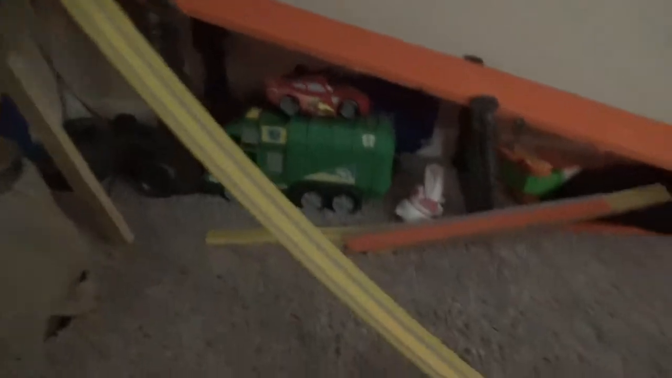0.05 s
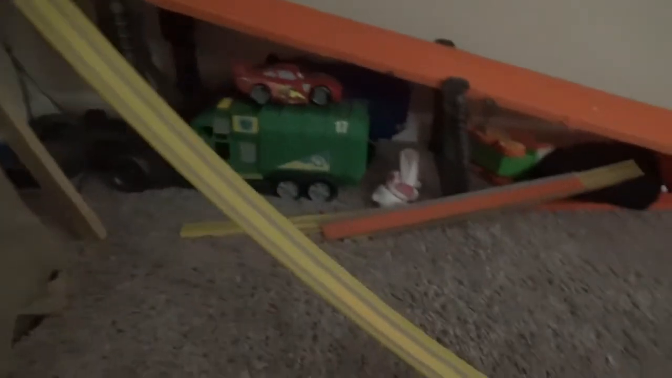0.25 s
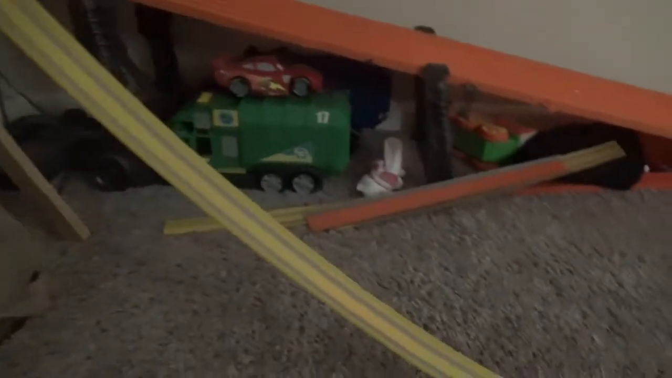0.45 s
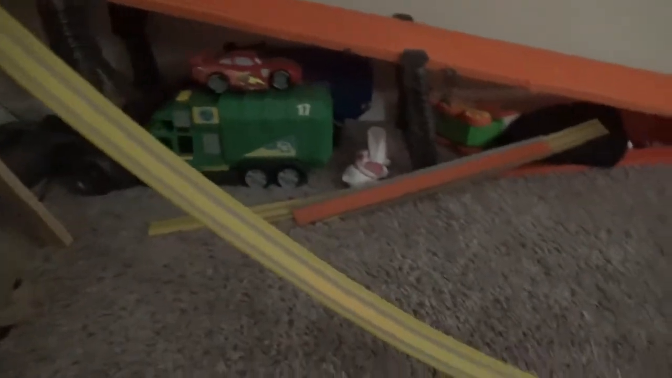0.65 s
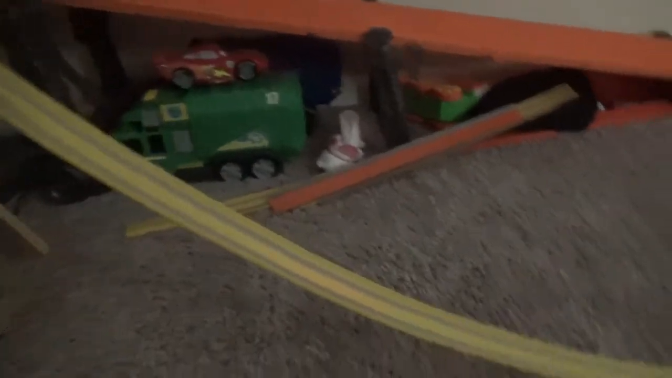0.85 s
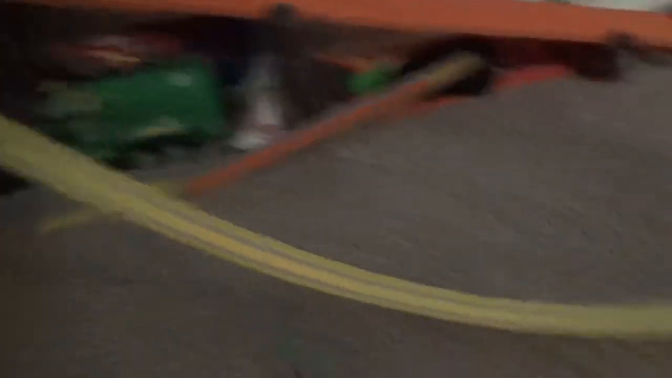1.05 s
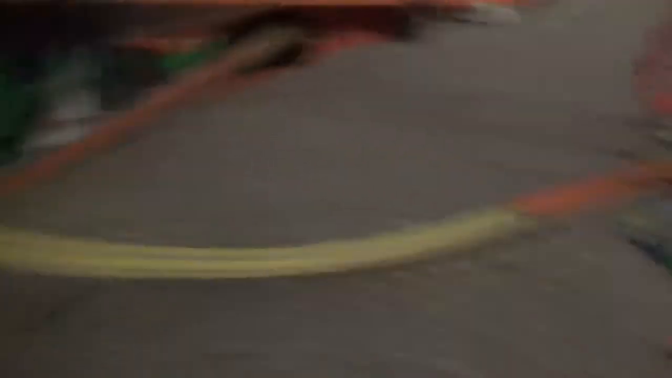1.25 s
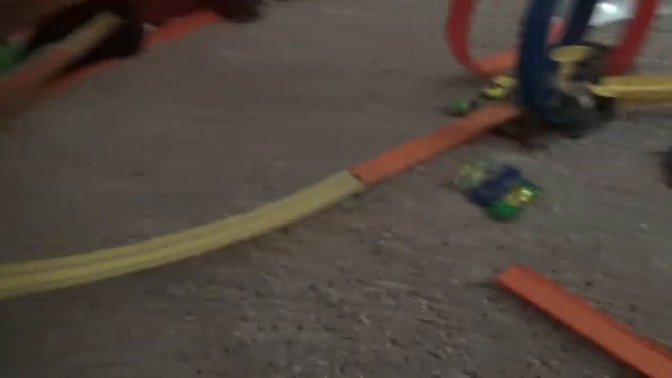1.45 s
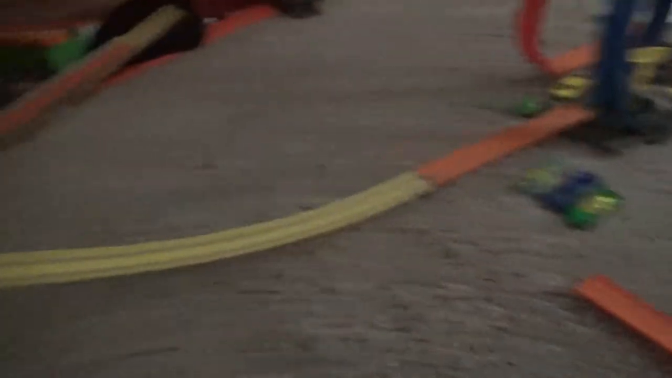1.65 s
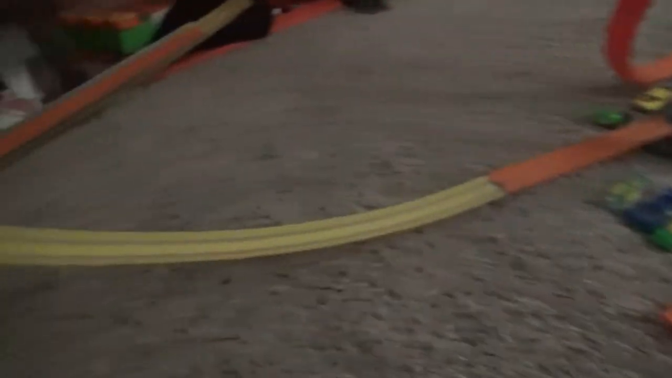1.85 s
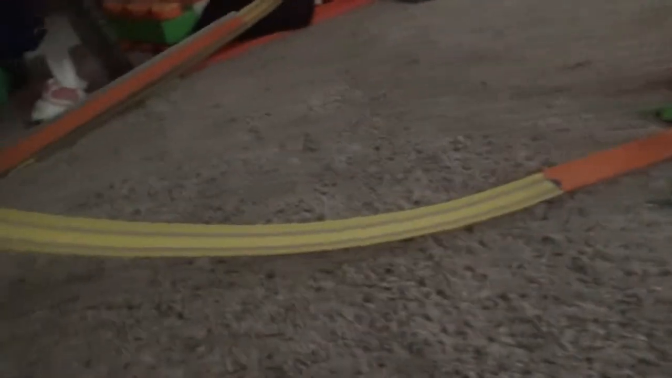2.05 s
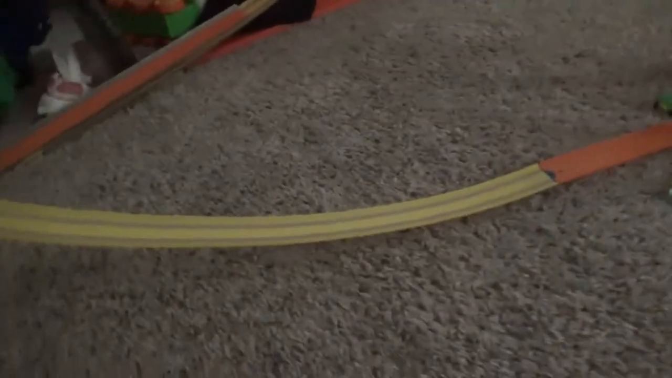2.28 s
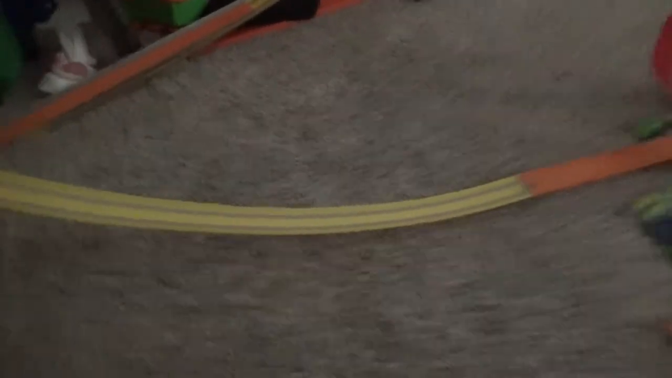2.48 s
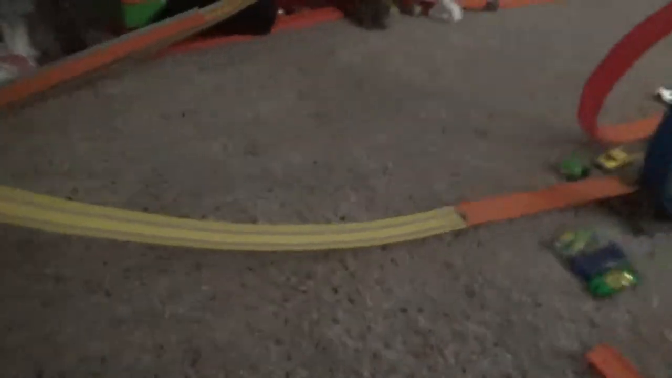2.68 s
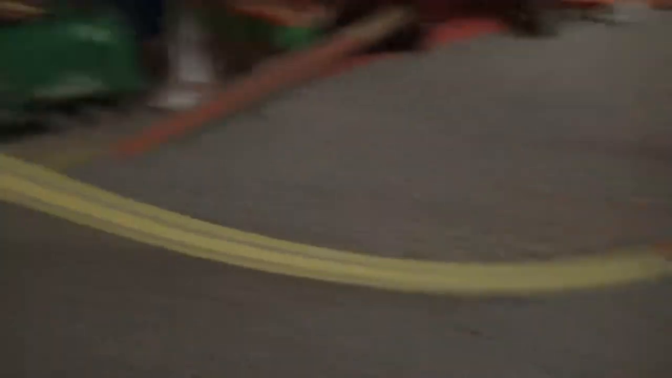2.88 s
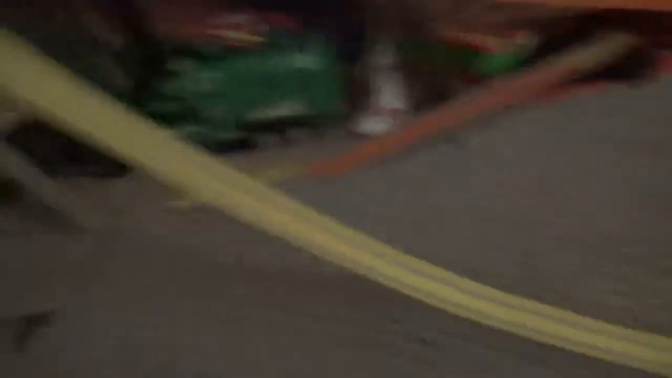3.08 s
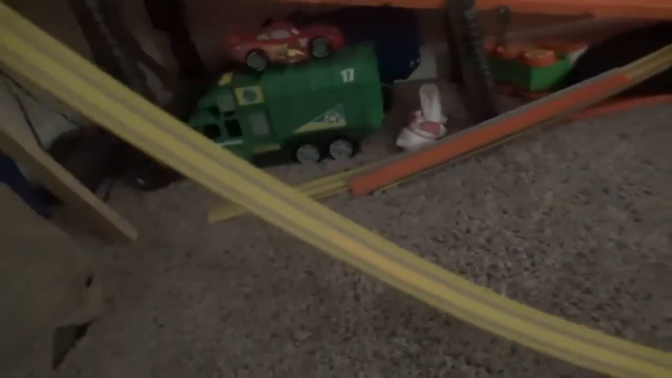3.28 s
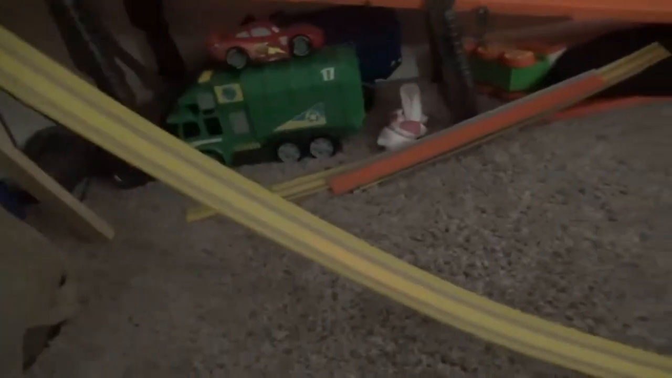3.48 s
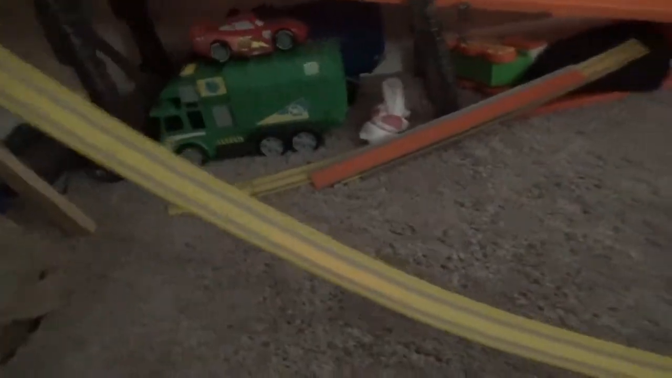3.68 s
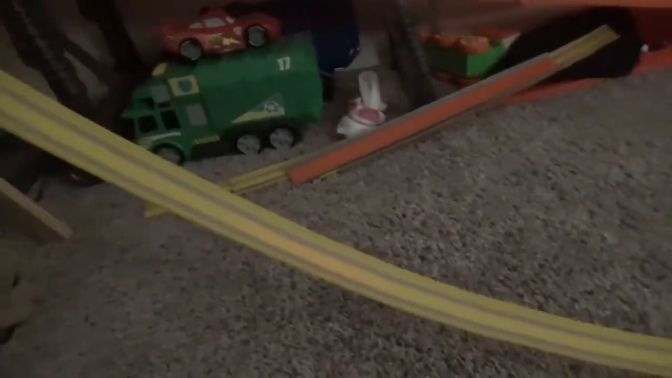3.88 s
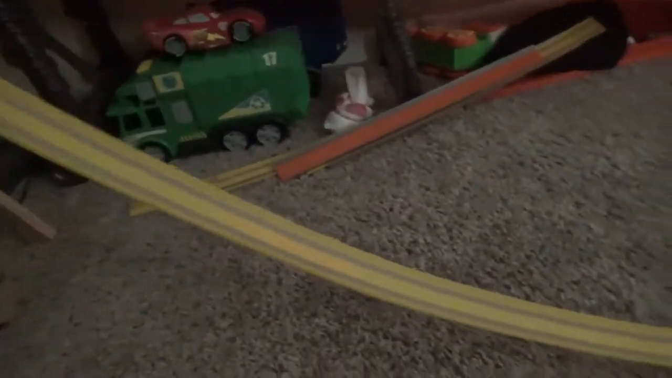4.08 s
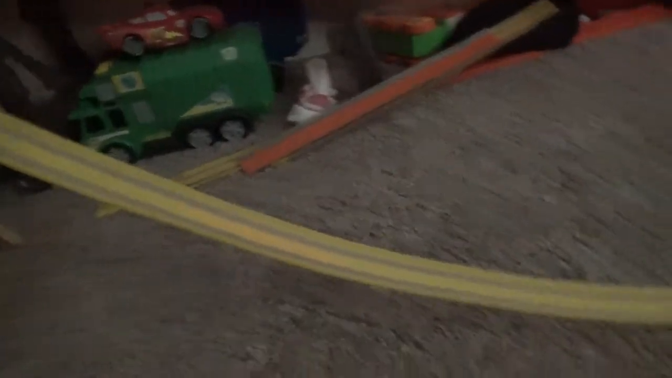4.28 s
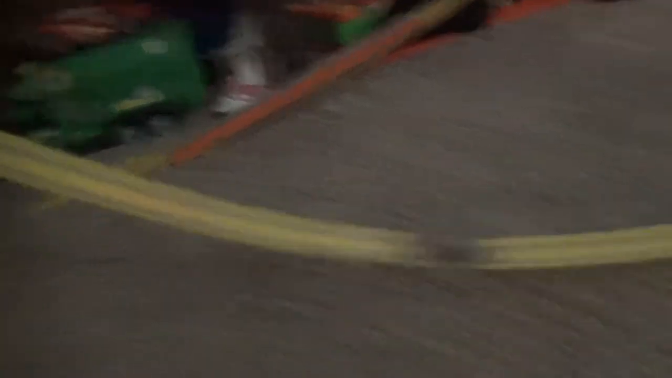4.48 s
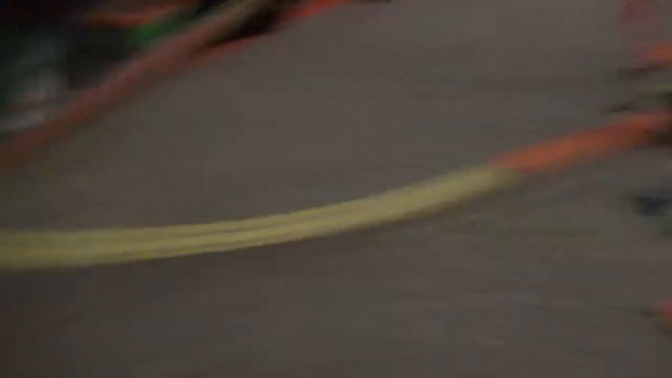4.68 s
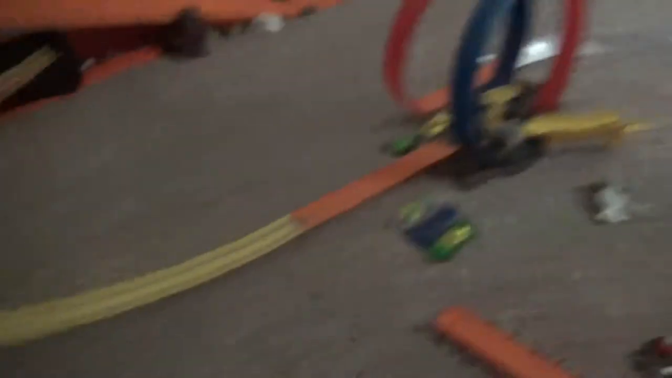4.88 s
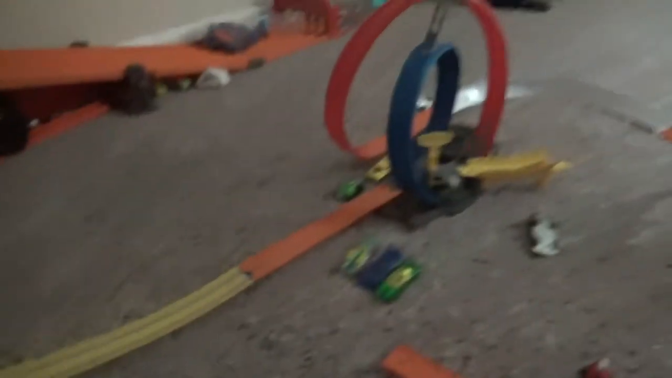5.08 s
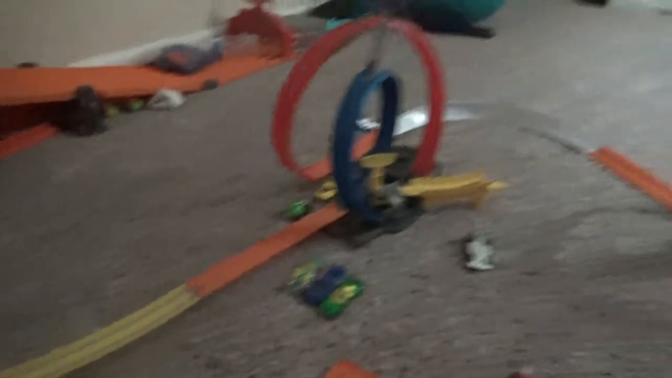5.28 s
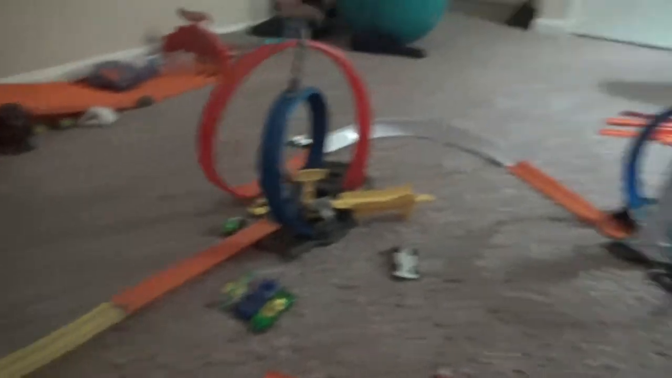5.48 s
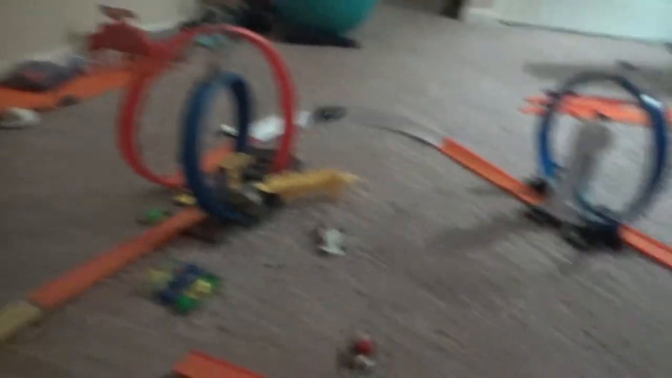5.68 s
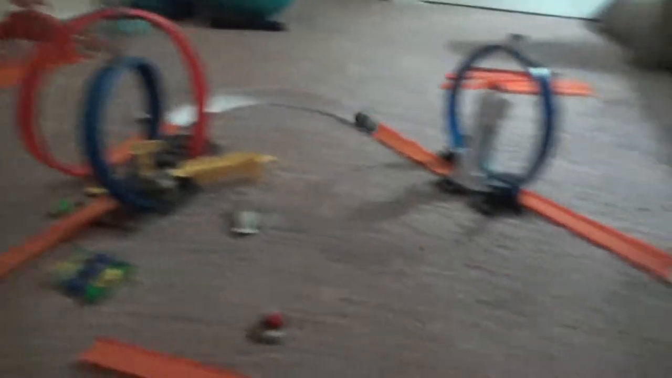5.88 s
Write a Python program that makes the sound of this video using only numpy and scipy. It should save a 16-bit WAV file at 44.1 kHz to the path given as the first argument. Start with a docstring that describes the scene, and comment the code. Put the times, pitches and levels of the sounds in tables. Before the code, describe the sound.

Hard plastic clacks with rising scraping hiss come first, followed by dull floor bumps and small bright metallic clicks that thin out. A few more gate knocks lead to release: a toy car's wheels buzz and rattle over hollow track, swelling and dipping, snapping over joints to the end. Indoors, short room reflections, close handheld stereo microphone.

```python
"""A start gate clacks and scrapes in a quiet carpeted room with a faint hum: a toy car is being loaded.
Soft bumps sound close by and die-cast cars click in a hand; then the car rattles down a plastic track,
through a loop and over the joints. Random bursts and streams of tiny contacts ring filters shaped like
the toys; a bump is one low push. A hand-held camera hears it all in stereo, with the room's answer."""
import sys
import numpy as np
from scipy import signal
from scipy.fft import rfft, irfft, next_fast_len
from scipy.io import wavfile
from scipy.ndimage import uniform_filter1d, map_coordinates

SR = 44100
rng = np.random.default_rng(int(sys.argv[2]) if len(sys.argv) > 2 else 0)


def digitize_waveform(pressure):
    """Quantize a signal to 16-bit integers and store it at the path in sys.argv[1].

    Rows of a 2-D input are taken as channels; values are limited to [-1, 1].
    """
    field = np.atleast_2d(pressure).T
    bounded = np.clip(field, -1, 1)
    quanta = np.round(bounded * 32767).astype(np.int16)
    wavfile.write(sys.argv[1], SR, quanta)


N = 261954  # length in samples
FILTER_SIZE = 18432  # samples


def amp(db):
    """Turn decibels into a gain."""
    return 10 ** (np.asarray(db) / 20)


def unit(x):
    """Scale x to an rms of 1."""
    return x / np.sqrt(np.mean(x ** 2) + 1e-20)


def along(points, hz):
    """Read a curve of (f/Hz, value) points at any frequency, on a log frequency axis."""
    f, value = np.transpose(points)
    return np.interp(np.log(hz + 1), np.log(f + 1), value)


def wobble(rate):
    """A smooth random curve through `rate` random points a second."""
    points = rng.standard_normal(int(N * rate / SR) + 4)
    return map_coordinates(points, [np.arange(N) * rate / SR])


def filtered(x, response):
    """Weigh each frequency of x by response(hz)."""
    size = next_fast_len(x.shape[-1] + FILTER_SIZE)
    spectrum = rfft(x, size) * response(np.fft.rfftfreq(size, 1 / SR))
    return irfft(spectrum, size)[..., :x.shape[-1]]


# how much two close microphones differ in sound from all around: f/Hz, side level re middle/dB
STEREO_WIDTH = [(100, -32), (300, -18.5), (1300, -6), (5500, -5.5), (9000, -6), (13000, -46)]


def spread(pair):
    """Make unrelated signals into left and right: close microphones differ by an amount set by pitch."""
    side = filtered(pair[1], lambda hz: amp(along(STEREO_WIDTH, hz)))
    return np.array([pair[0] + side, pair[0] - side])


# colour of the still room's noise, shape only: f/Hz, level/dB
AIR_COLOUR = [(15, -38), (25, -12), (69, -4), (178, -3.5), (246, -8), (281, -11.5), (482, -10),
              (762, -13.5), (1240, -17), (1380, -19.5), (1710, -22), (2060, -24), (2230, -20.5),
              (3630, -25), (15500, -33)]


def still_room(air_db=-46.0, hum_db=-59, mains_hz=60):
    """Soft coloured noise for the room's air, and a faint mains hum whose strength wavers."""
    noise = spread(rng.standard_normal((2, N)))
    air = unit(filtered(noise, lambda hz: amp(along(AIR_COLOUR, hz))))
    tone = np.sin(2 * np.pi * mains_hz * np.arange(N) / SR)
    hum = unit(tone * amp(8.3 * wobble(4.2)))
    return amp(air_db) * air + amp(hum_db) * hum


def contacts(rate, scatter_db, judder_db, judder_rate):
    """Tiny uneven impacts, about `rate` a second, of limited strength that swells and sinks in clumps."""
    kicks = (rng.random(N) < rate / SR) * rng.choice([-1, 1], N)
    scatter = scatter_db * np.tanh(rng.standard_normal(N))
    judder = judder_db * np.tanh(wobble(judder_rate))
    return kicks * amp(scatter + judder)


def stroke_gain(rows, attack_s, release_s, swell_db_per_s=0):
    """Loudness of (start, length, level) strokes: each fades in, holds or swells to its level, dies away."""
    t, gain = np.arange(N) / SR, np.zeros(N)
    for start, length, db in rows:
        end = start + length
        gate = np.interp(t, [start - attack_s, start, end, end + release_s], [0, 1, 1, 0]) ** 2
        gain += gate * amp(db - swell_db_per_s * np.maximum(end - t, 0))
    return gain


def body(spectrum, modes=()):
    """How a thing sounds when tapped: a broad spectrum with resonances (f/Hz, width/Hz, level/dB) on it."""
    hz = np.fft.rfftfreq(FILTER_SIZE, 1 / SR)
    peaks = sum(amp(db) ** 2 / (1 + (2 * (hz - centre) / width) ** 2) for centre, width, db in modes)
    loudness = amp(along(spectrum, hz)) * np.sqrt(1 + peaks)
    # fold the cepstrum so that nothing sounds before the tap (minimum phase)
    cepstrum = irfft(np.log(loudness))
    cepstrum[1:FILTER_SIZE // 2] *= 2
    cepstrum[FILTER_SIZE // 2:] = 0
    return irfft(np.exp(rfft(cepstrum)))[:4096]


# where the action is, seen from the camera: t/s, bearing (1 = left .. -1 = right)
BEARING = [(0, 0.7), (0.95, 0.55), (1.1, 0.05), (1.4, 0.75), (2.4, 0.55), (2.8, 0.42), (4.1, 0.45),
           (4.36, 0.87), (4.5, -0.015), (5.2, -0.024), (5.94, 0.072)]
# how a sound from fully one side differs between the microphones: f/Hz, side level re middle/dB
SHADE = [(200, -31), (700, -11), (1300, -4), (4400, -1), (6800, -2.5), (8500, -6), (14000, -12)]


def direct(x, s):
    """x straight from its bearing, starting at s: the camera's body shades the far microphone."""
    bearing = np.interp(s + np.arange(len(x)) / SR, *np.transpose(BEARING))
    side = bearing * filtered(x, lambda hz: amp(along(SHADE, hz)))
    return np.array([x + side, x - side])


# how long the room takes to fade by 60 dB: f/Hz, t60/s
ROOM_FADE = [(150, 0.24), (1000, 0.48), (2700, 0.45), (7000, 0.45), (14000, 0.27)]
# colour of what the carpeted room gives back: f/Hz, level/dB
CARPET = [(9000, 0.5), (11000, 0), (15000, 0.5)]


def in_room(x, room_db, build_s=0.0026):
    """The room's answer to x: a fresh random tail that builds up, then fades at each pitch's own speed."""
    hz, t, grid = signal.stft(rng.standard_normal((2, FILTER_SIZE)), SR, nperseg=256)
    fade_db = along(CARPET, hz)[:, None] - 60 * t / along(ROOM_FADE, hz)[:, None]
    tail = signal.istft(grid * amp(fade_db), SR, nperseg=256)[1]
    tail *= 1 - np.exp(-(np.arange(tail.shape[1]) / SR / build_s) ** 2)
    answer = amp(room_db) * spread(tail / np.linalg.norm(tail[0]))
    return signal.fftconvolve(x[None], answer, axes=1)


def add(out, s, x):
    """Mix x into out at time s."""
    start = max(0, round(s * SR))
    out[:, start:start + x.shape[1]] += x[:, :N - start]


def at_level(x, db, window_s=0.0014):
    """Scale x so that its loudest short window has this level."""
    power = uniform_filter1d(x ** 2, max(2, round(window_s * SR)), mode="constant")
    return amp(db) * x / np.sqrt(power.max())


def chatter(force, ranges, modes, room_db, uneven_db=2, uneven_rate=70):
    """A stream of contacts rings each (spectrum, gain) range, never quite evenly."""
    sound = np.zeros(N)
    for spectrum, gain in ranges:
        stress = force * amp(uneven_db * np.tanh(wobble(uneven_rate)))
        sound += gain * unit(signal.oaconvolve(stress, body(spectrum, modes))[:N])
    out, step = direct(sound, 0), SR // 10
    # the room answers differently from each place along the way
    for start in range(0, N, step):
        add(out, start / SR, in_room(sound[start:start + step], room_db))
    return out / np.sqrt(1 + amp(room_db) ** 2)  # make space for the room's share


# three ranges in which the toys ring, low to high, shape only: f/Hz, level/dB
HOLLOW = [(200, -34), (700, -16), (1100, -8.5), (1400, -2.5), (2100, 2.5), (2800, -5), (6000, -57)]
SHELL = [(700, -52.5), (1900, -12.5), (2600, -1.5), (3400, 0.5), (5200, 4.5), (6800, -8.5), (14000, -56.5)]
BRIGHT = [(2000, -45), (4800, -5), (6500, -2.5), (8700, 2.5), (10000, -1), (11200, -8), (13000, -12.5),
          (15500, -21)]


def hard_blows(table, modes, attack_s, ring_width_hz=690, ring_db=9):
    """Each blow is a dying burst of tiny contacts that rings a toy's three ranges and any pitches of its own.

    Rows: t/s, level of the bright part/dB, hollow and shell parts re that/dB, chatter t60/s, room/dB, f/Hz..."""
    out, t = np.zeros((2, N)), np.arange(SR // 10) / SR
    for s, db, hollow_db, shell_db, t60, room_db, *pitches in table:
        rings = list(modes) + [(hz, ring_width_hz, ring_db) for hz in pitches]
        fade = amp(-60 * t / max(t60, .002))
        burst = rng.standard_normal(len(t)) * fade * (1 - np.exp(-t / attack_s))
        blow, radiated = 0, 0
        for spectrum, relative_db in (HOLLOW, hollow_db), (SHELL, shell_db), (BRIGHT, 0):
            response = body(spectrum, rings)
            part = at_level(signal.fftconvolve(burst, response), db + relative_db)
            blow = blow + part
            # the room gathers all directions: the same energy in a smoother spectrum
            radiated = radiated + response * np.linalg.norm(part) / np.linalg.norm(response)
        add(out, s, direct(blow, s))
        add(out, s, in_room(0.89 * radiated + 0.63 * blow[:len(radiated)], room_db))
    return out


# clacks of the start gate: t/s, level/dB, hollow tone re level/dB, chatter t60/s, room/dB
GATE_CLACKS = [(0.005, -15.5, -4, 0.039, 4), (0.590, -17, 4, 0.078, -2.5), (0.648, -17, 0.5, 0.06, -3.5),
               (0.698, -15.5, 3, 0.029, -0.5), (0.783, -17, -3, 0.045, -2.5), (0.811, -17.5, -8, 0.046, -4),
               (0.875, -18.5, -26, 0.018, 5.5), (0.929, -14, -9, 0.034, -8), (0.942, -13, -4.5, 0.046, -11),
               (3.215, -21.5, 1, 0.013, 4), (3.239, -12.5, 2, 0.032, -10.5), (3.336, -25.5, -25, 0.019, 0),
               (3.394, -30, -5, 0.02, -3), (3.417, -33, 9, 0.015, -6.5), (3.625, -16.5, -5.5, 0.055, 7.5),
               (3.967, -48.5, 12, 0.067, 3.5), (4.030, -24.5, 7.5, 0.029, -2), (4.091, -21.5, 4, 0.03, -2),
               (4.136, -17.5, 4, 0.047, -1.5)]
# the car scrapes in the gate: start t/s, length t/s, hiss level at the end/dB, hollow tone level/dB
GATE_SCRAPES = [(0.504, 0.075, -53, -48.5), (0.586, 0.16, -27.5, -33.5), (0.778, 0.17, -21.5, -30),
                (1.151, 0.075, -60, -34), (3.303, 0.13, -46, -36), (3.99, 0.05, -48, -48),
                (4.031, 0.17, -31, -34.5)]
# pitches at which the gate rings: f/Hz, width/Hz, level above the broad sound/dB
GATE_MODES = [(359, 18, 20), (1372, 67, 8), (1587, 230, 5.5), (1950, 47, -11), (2304, 56, 2),
              (2880, 42, -2.5), (5220, 250, 0.5), (5900, 190, -3), (7140, 120, 2), (9100, 250, 3)]
# the lowest range of the scrapes and of the car's run, shape only: f/Hz, level/dB
RUMBLE = [(30, -46), (70, -30), (110, 6.5), (150, 4.5), (350, -4.5), (600, 5.5), (900, 2.5), (1400, -26.5),
          (4000, -82)]


def loading(clack_shell_db=-1.5, bright_db=-4, rumble_db=-9):
    """The car scrapes into the start gate with a hiss that grows along each push, and the gate clacks."""
    force = contacts(rate=1500, scatter_db=6.0, judder_db=3, judder_rate=300)
    hiss_rows = [(s, length, hiss_db) for s, length, hiss_db, _ in GATE_SCRAPES]
    hollow_rows = [(s, length, hollow_db) for s, length, _, hollow_db in GATE_SCRAPES]
    hiss = stroke_gain(hiss_rows, attack_s=0.019, release_s=0.01, swell_db_per_s=21)
    hollow = stroke_gain(hollow_rows, attack_s=0.021, release_s=0.021)
    ranges = [(RUMBLE, amp(rumble_db) * hollow), (HOLLOW, hollow),
              (SHELL, hiss), (BRIGHT, amp(bright_db) * hiss)]
    scraping = chatter(force, ranges, GATE_MODES, room_db=-2.5)
    clacks = [(s, db, hollow_db, clack_shell_db, t60, room_db)
              for s, db, hollow_db, t60, room_db in GATE_CLACKS]
    return scraping + hard_blows(clacks, GATE_MODES, attack_s=0.00056)


# dull bumps: t/s, level/dB
BUMPS = [(0.018, -30.5), (1.07, -17.5), (1.094, -25.5), (1.108, -19), (1.128, -20), (1.358, -17),
         (2.278, -37.5), (2.447, -17.5), (3.379, -31), (3.631, -32.5), (4.1, -36), (4.143, -32.5),
         (4.736, -29), (4.774, -31.5), (5.477, -22.5), (5.711, -30.5), (5.809, -32.5)]
# range of a bump, shape only: f/Hz, level/dB
THUD = [(40, -25), (100, -10), (160, 4), (280, -1.5), (500, -4.5), (750, -11), (1300, -22), (4000, -112)]
# pitches at which the floor rings: f/Hz, width/Hz, level above the broad sound/dB
FLOOR_MODES = [(157.5, 11, 2.7), (201, 12, 4.5), (278, 20, 2.9), (358, 13, 5)]


def bumps(room_db=-1.5):
    """A soft contact is one low push on the floor that the room prolongs."""
    out, response = np.zeros((2, N)), body(THUD, FLOOR_MODES)
    for s, db in BUMPS:
        push = at_level(response, db)
        add(out, s, direct(push, s))
        add(out, s, in_room(push, room_db))
    return out


# cars rub in the hand: start t/s, length t/s, level/dB
RUBS = [(0.97, 0.136, -30.5), (1.6, 0.019, -36), (1.98, 0.059, -53), (2.61, 0.05, -46.5), (2.93, 0.59, -51)]
# cars click together: t/s, level/dB, shell tone re level/dB, ring f/Hz
CLICKS = [(1.07, -10.5, -26, 8800), (1.1549, -12.5, 0.5, 8200), (1.165, -29, 14, 5450),
          (1.179, -21.5, -1, 9400), (1.205, -23, -23, 9600), (1.356, -23, -2, 6200),
          (1.3661, -16.5, -3.5, 7800), (1.5377, -24, -2, 5630), (1.595, -25, -2, 7940),
          (1.6562, -31.5, 4, 4800), (1.8446, -38.5, 7, 5040), (1.8644, -31.5, 1, 5540),
          (1.8883, -36, 3.5, 5600), (2.0204, -39.5, -3, 7200), (2.271, -31, -0.5, 4450),
          (2.276, -31, 8, 4370), (2.4393, -16, -2, 7800), (2.6434, -35.5, -0.5, 5770),
          (2.661, -32.5, -3, 2900), (2.7762, -26, -5.5, 8000), (2.9073, -18, -5.5, 7400),
          (3.02, -32, -14, 10300), (3.0682, -26, -7, 10800), (3.0969, -34, -12, 8140)]
# pitches at which the cars ring: f/Hz, width/Hz, level above the broad sound/dB
CAR_MODES = [(3260, 390, 5.5), (5540, 44, 10), (7450, 71, -6), (8600, 370, 2), (9630, 47, 12)]


def handling(hollow_re_shell_db=-15, click_t60_s=0.022, click_room_db=-6):
    """Spare cars in a hand: sparse contacts make the rubbing, short bursts the clicks."""
    force = contacts(rate=350, scatter_db=16, judder_db=3, judder_rate=32)
    rub_gain = stroke_gain(RUBS, attack_s=0.035, release_s=0.028)
    rubbing = chatter(force, [(BRIGHT, rub_gain)], CAR_MODES, room_db=6)
    clicks = [(s, db, shell_db + hollow_re_shell_db, shell_db, click_t60_s, click_room_db, hz)
              for s, db, shell_db, hz in CLICKS]
    return rubbing + hard_blows(clicks, CAR_MODES, attack_s=0.00026)


# each piece of track rings at its own pitch: t/s when the car enters it, f/Hz
TRACK_PIECES = [(4.04, 1710), (4.2, 3980), (4.359, 3300), (4.57, 4130), (4.63, 3290), (5.07, 3670),
                (5.6, 2540)]
# shape of every piece's ring: width/Hz, level/dB
PIECE_RING = (1450, 9)


def over_pieces(x):
    """Pass x through the resonance of whichever piece of track the car is on."""
    width_hz, peak_db = PIECE_RING
    hz, t, grid = signal.stft(x, SR, nperseg=256)
    starts, pitches = np.transpose(TRACK_PIECES)
    centre = pitches[np.maximum(np.searchsorted(starts, t) - 1, 0)]
    off_pitch = 2 * (hz[:, None] - centre) / width_hz
    gain = np.sqrt(1 + amp(peak_db) ** 2 / (1 + off_pitch ** 2))
    return signal.istft(grid * gain, SR, nperseg=256)[1][:N]


# the car's run, before the trims in racing(): t/s, rattle level/dB, treble re rattle/dB
RUN = [(4.04, -42, -9), (4.076, -28, 0), (4.098, -21, -7), (4.128, -35, 2), (4.14, -26.5, 6),
       (4.172, -27.5, 4.5), (4.398, -12.5, -7.5), (4.42, -19, 0), (4.494, -13.5, 2), (4.59, -15.5, -3),
       (4.684, -29.5, 3.5), (4.758, -11.5, -3.5), (4.928, -43, 9.5), (4.95, -21, -2), (4.982, -16, -7),
       (5.05, -19, -4), (5.06, -19.5, 6.5), (5.198, -17, 1), (5.298, -28.5, -3.5), (5.49, -18, 1.5),
       (5.536, -28.5, 1.5), (5.748, -18.5, 1), (5.796, -28, 5), (5.94, -25, 2.5)]
# hollow drumming of the plastic track and gate under the car: in the gate, in the loop,
# at a joint and along the run: start t/s, length t/s, level/dB
DRUMMING = [(0.88, 0.086, -32), (3.23, 0.023, -37), (3.64, 0.032, -36), (4.735, 0.033, -33),
            (4.97, 0.17, -37.5), (5.12, 0.1, -27.5), (5.465, 0.024, -25.5), (5.66, 0.27, -42)]
# range of the drumming, shape only: f/Hz, level/dB
DRUM = [(200, -46), (520, -14), (700, 9.5), (1100, 8), (1500, 5), (4000, -30)]
# wheels hit the track joints: t/s, level/dB, shell tone re level/dB
JOINTS = [(4.3254, -10.5, 3), (4.518, -22, 4), (4.649, -12.5, 2), (4.7039, -18, 7), (4.9437, -21.5, 1),
          (5.059, -19, -22), (5.4786, -11.5, -2), (5.669, -10, -3), (5.7194, -16, -2), (5.7302, -21, -5),
          (5.7518, -19, -1), (5.8132, -7, -12), (5.8402, -12, 0), (5.8936, -12, -32)]
# pitches at which the track rings: f/Hz, width/Hz, level above the broad sound/dB
TRACK_MODES = [(212, 8.7, -13), (349, 65, 9.5), (1540, 29, 4.5), (1710, 200, -1), (3214, 220, 0.5),
               (3350, 45, -15), (4460, 270, 4.5), (6020, 92, 5), (8300, 91, -31)]


def racing(shell_db=-2, bright_db=-1.5, cruise_db=-22):
    """Contacts rattle and drum the plastic under the car, and short bursts clack as wheels hit joints."""
    force = contacts(rate=1400, scatter_db=3.5, judder_db=3.0, judder_rate=130)
    t, (times, *columns) = np.arange(N) / SR, np.transpose(RUN)
    rattle_db, treble_db = [np.interp(t, times, column) for column in columns]
    effort_db = rattle_db - cruise_db  # rattle above that of an ordinary speed
    # rumble and hollow tone grow more slowly than the rattle
    levels = [(RUMBLE, -40.5 + 0.43 * effort_db), (HOLLOW, -27 + 0.54 * effort_db),
              (SHELL, rattle_db + shell_db), (BRIGHT, rattle_db + treble_db + bright_db)]
    ranges = [(spectrum, amp(db) * (t > times[0])) for spectrum, db in levels]
    ranges.append((DRUM, stroke_gain(DRUMMING, attack_s=0.021, release_s=0.037)))
    wheels = chatter(over_pieces(force), ranges, TRACK_MODES, room_db=-4.5)
    hollow_db, chatter_t60_s, room_db = -13.5, 0.0099, -3  # the same for every joint
    knocks = [(s, db, hollow_db, joint_shell_db, chatter_t60_s, room_db)
              for s, db, joint_shell_db in JOINTS]
    return wheels + hard_blows(knocks, TRACK_MODES, attack_s=0.00021)


def scene():
    """The toys in the still room."""
    return still_room() + loading() + bumps() + handling() + racing()


def record(dry, ceiling=0.85, hardness=5, top_hz=15900):
    """The camera rounds off the highest peaks and keeps nothing above its top frequency."""
    rounded = dry / (1 + np.abs(dry / ceiling) ** hardness) ** (1 / hardness)
    return filtered(rounded, lambda hz: hz < top_hz)


dry = scene()
out = record(dry)
digitize_waveform(out)
```